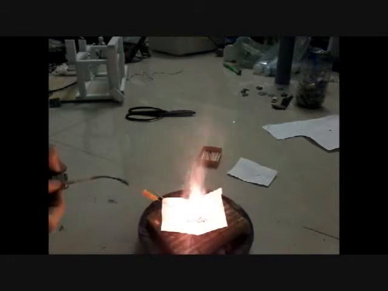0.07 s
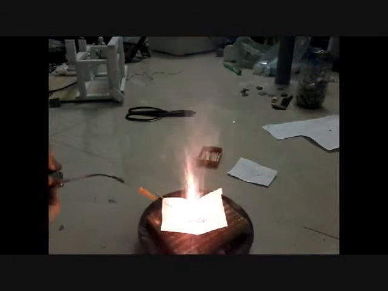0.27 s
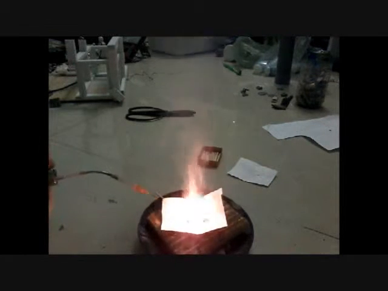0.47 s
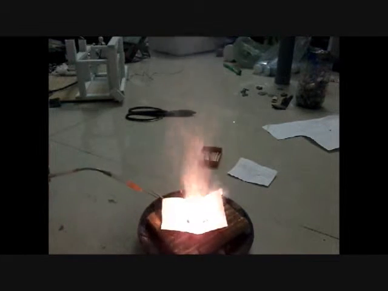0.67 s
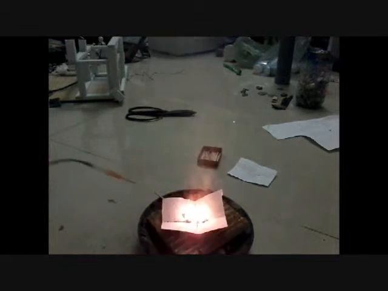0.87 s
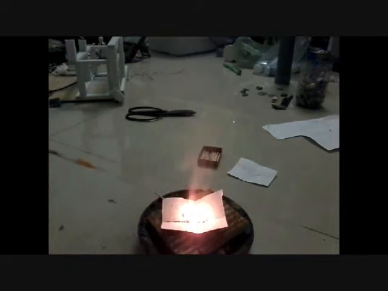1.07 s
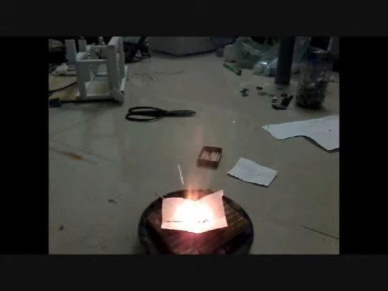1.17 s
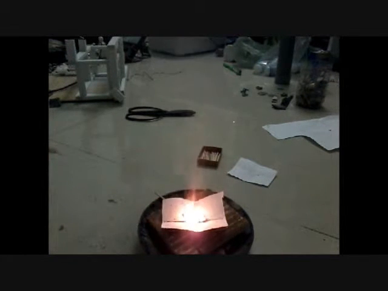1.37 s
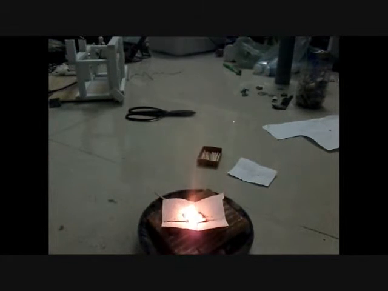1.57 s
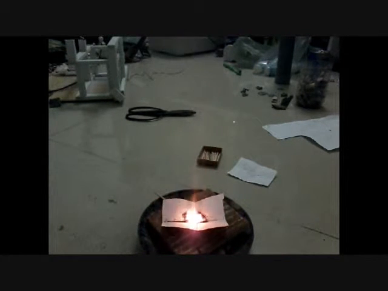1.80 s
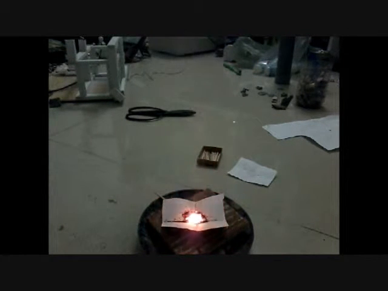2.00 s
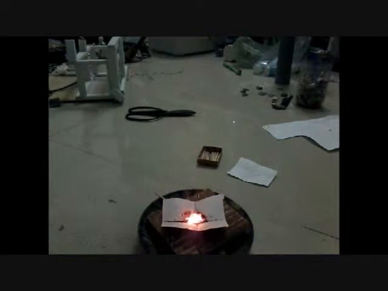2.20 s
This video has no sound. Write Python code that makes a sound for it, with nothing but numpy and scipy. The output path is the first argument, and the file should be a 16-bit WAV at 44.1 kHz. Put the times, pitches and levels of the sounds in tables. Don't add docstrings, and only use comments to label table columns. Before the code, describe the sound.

A small heap of powder flares on paper, fizzing brightly with loud sharp pops, then sputtering out

```python
import sys
import numpy as np
from scipy import signal
from scipy.fft import rfft, irfft
from scipy.io import wavfile

SR = 44100
rng = np.random.default_rng(int(sys.argv[2]) if len(sys.argv) > 2 else 0)


def generate_wav(signal):
    frames = np.transpose(np.atleast_2d(signal))
    scaled = np.clip(frames, -1, 1) * 32767
    pcm = np.round(scaled).astype(np.int16)
    wavfile.write(sys.argv[1], SR, pcm)


def natural_amplitude(level_db):
    exponent = np.asarray(level_db, float) / 20
    return 10 ** exponent


N = 98872

# time in seconds, fizz level in dB.
BURN = [(0, -45), (.12, -39), (.25, -32.5), (.32, -35), (.41, -30.5), (.54, -33), (.62, -32), (.8, -28.5),
        (.9, -30), (1.05, -34.5), (1.2, -37), (1.3, -34), (1.42, -35.5), (1.55, -37.5), (1.75, -29),
        (1.88, -40), (2.02, -46), (2.24, -46.5)]
# time in
# seconds, peak in dB.
LARGE_GRAIN_POPS = [(0.1868, -19), (0.2491, -18), (0.2559, -18), (0.3427, -17), (0.3541, -15), (0.3686, -16),
                    (0.3929, -11), (0.4128, -16), (0.4402, -14), (0.5083, -16), (0.6987, -8), (0.7093, -15),
                    (0.7165, -13), (0.7736, -11), (0.8284, -10), (0.8537, -4), (0.8571, -13), (0.875, -9),
                    (0.8944, -14), (0.9131, -12), (0.9296, -4), (0.9332, -6), (0.98, -6), (1.0022, -17),
                    (1.0137, -13), (1.0462, -19), (1.0879, -19), (1.0904, -9), (1.1298, -14), (1.1327, -20),
                    (1.2555, -21), (1.2611, -8), (1.2728, -13), (1.3008, -13), (1.3705, -12), (1.3856, -18),
                    (1.4127, -19), (1.4321, -18), (1.4395, -19), (1.4441, -20), (1.5538, -16), (1.56, -18),
                    (1.5872, -9), (1.824, -18), (1.8774, -19), (1.9544, -19), (1.9759, -23), (2.0323, -21),
                    (2.0713, -25), (2.0739, -24), (2.0768, -28), (2.1107, -28), (2.1239, -26),
                    (2.1258, -17), (2.1327, -26), (2.1415, -22), (2.1515, -21), (2.1607, -24),
                    (2.1662, -21), (2.2249, -26)]
# time in seconds, pops per second, peak in dB.
LONG_SPUTTER = [
    (1.5995, 135, -15),
    (1.614, 150, -3),
    (1.635, 270, -7),
    (1.66, 340, -4.5),
    (1.712, 430, -3.5),
    (1.725, 640, -3.5),
    (1.75, 760, -8),
    (1.754, 800, -14),
    (1.86, 900, -35),
]
# start in seconds, length in seconds, pops per second, peak in dB.
SHORT_SPUTTERS = [
    (1.4635, .073, 320, -17.5),
    (1.568, .017, 260, -16.5),
]
# frequency in Hz, level in dB per Hz.
ROAR_COLOUR = [(88, 2), (150, -4), (412, -6), (578, -2), (1210, -17.5), (1500, -4.5), (1950, -97),
               (3300, -120)]
# time in seconds, peak in dB, pitch in Hz, length in seconds.
GULPS = [
    (.42, -47, 250, .04),
    (.495, -44, 400, .02),
    (1.285, -44, 650, .09),
    (1.453, -42, 550, .016),
    (1.61, -48, 300, .025),
]
# frequency in Hz, level in dB per Hz.
HUM_COLOUR = [(12, -38), (20, -45), (43, -28), (117, 2.5), (198, -7.5), (394, -16.5), (447, -13.5),
              (1500, -27), (1950, -37), (3300, -120)]
# frequency in Hz, level in dB.
MICROPHONE = [(2900, -22.5), (3700, -17.5), (4700, -20.5), (5900, -14), (7600, -15), (9400, -22.5),
              (11800, -19), (14400, -27.5)]
# delay in seconds, level in dB.
ECHOES = [(.0005, -13), (.0017, -14), (.0024, -14), (.0036, -17), (.007, -17)]

GRAINS_PER_S, GRAIN_SPREAD_DB, FLICKER_DB, FLICKER_HZ = 3100, 1, -1.3, 30
POP_DB, POP_TILT, POP_RISE_S = .5, .3, .0003
SPUTTER_JITTER, SPUTTER_SPREAD_DB, SPUTTER_TOP_HZ, LONG_SPUTTER_DB = .22, 2.5, 8800, -0.15
POCKET_HZ, POCKET_Q, POCKET_SHARE = 3230, 1.62, 0.81
SNAP_LOW_HZ = 776
ROAR_DB, ROAR_FOLLOW, ROAR_FLICKER_DB, ROAR_LAG_S = -50, 1, -1.5, 0.11
HUM_DB = -59
RING_HZ, RING_Q = 6180, 5
ROOM_DB, ROOM_T60_S = -9, .3
SELF_NOISE_DB, EDGE_HZ, RUMBLE_CUT_HZ = -54, 14700, 70


def evened(x):
    return x / np.sqrt(np.mean(x ** 2) + 1e-20)


def read(points, hz):
    f, value = np.transpose(points)
    return np.interp(np.log(hz + 1), np.log(f + 1), value)


def coloured(points):
    spectrum = rfft(rng.standard_normal(N))
    gain = natural_amplitude(read(points, np.fft.rfftfreq(N, 1 / SR)))
    return evened(irfft(spectrum * gain, N))


def wander(hz):
    f = np.fft.rfftfreq(N, 1 / SR)
    smooth = (f > 0) / (1 + (f / hz) ** 2)
    return evened(irfft(rfft(rng.standard_normal(N)) * smooth, N))


def burn_db():
    return np.interp(np.arange(N) / SR, *np.transpose(BURN))


def fizz():
    draw = rng.random((N, 3))
    size_db = GRAIN_SPREAD_DB * np.minimum(-np.log(draw[:, 1] + 1e-9), 5)
    push_or_pull = np.sign(draw[:, 2] - .5)
    snapping = draw[:, 0] < GRAINS_PER_S / SR
    grains = evened(natural_amplitude(size_db) * push_or_pull * snapping)
    return grains * natural_amplitude(burn_db() + FLICKER_DB * wander(FLICKER_HZ))


def pops():
    s, db = np.transpose(np.array(LARGE_GRAIN_POPS))
    clicks = np.zeros(N)
    clicks[np.round((s - POP_RISE_S) * SR).astype(int)] = natural_amplitude(db + POP_DB)
    return signal.lfilter([1, -POP_TILT], [1], clicks)


def bubble_train(s, rate_hz, db):
    t = np.arange(N) / SR
    unevenness = np.clip(1 + SPUTTER_JITTER * wander(250), .2, 2)
    pace = np.interp(t, s, rate_hz, 0, 0) * unevenness
    burst = np.diff(np.floor(np.cumsum(pace) / SR + .85), prepend=0)
    spread_db = SPUTTER_SPREAD_DB * np.clip(rng.standard_normal(N), -2, 1)
    return burst * natural_amplitude(np.interp(t, s, db) + spread_db)


def sputter():
    out = bubble_train(*np.transpose(LONG_SPUTTER)) * natural_amplitude(LONG_SPUTTER_DB)
    for s, length, rate_hz, db in SHORT_SPUTTERS:
        times = [s, s + length * .6, s + length]
        out = out + bubble_train(times, [rate_hz] * 3, [db - 2, db + 2.5, db - 4])
    hollow = signal.lfilter(*signal.iirpeak(POCKET_HZ, POCKET_Q, SR), out)
    out = 0.71 * out + POCKET_SHARE * hollow
    return signal.sosfilt(signal.butter(3, SPUTTER_TOP_HZ, fs=SR, output="sos"), out)


def roar():
    t = np.arange(N) / SR
    keep = np.exp(-1 / (ROAR_LAG_S * SR))
    start_db = BURN[0][1]
    late_db = signal.lfilter([1 - keep], [1, -keep], burn_db() - start_db) + start_db
    level_db = ROAR_DB + ROAR_FOLLOW * (late_db + 31) + ROAR_FLICKER_DB * wander(4.7)
    out = coloured(ROAR_COLOUR) * natural_amplitude(level_db)
    for s, db, hz, length in GULPS:
        band = [(hz / 4, -30), (hz / 1.8, -3), (hz, 0), (hz * 2.2, -5), (hz * 6, -25)]
        swell = np.exp(-((t - s) / length * 2) ** 2)
        out = out + coloured(band) * natural_amplitude(db - 6 + 2 * wander(60)) * swell
    return out


def hum():
    return natural_amplitude(HUM_DB) * coloured(HUM_COLOUR)


def microphone_ring():
    hz = np.fft.rfftfreq(4096, 1 / SR)
    resonance = 1 / abs(1 - (hz / RING_HZ) ** 2 + 1j * hz / RING_HZ / RING_Q)
    half = np.log(natural_amplitude(read(MICROPHONE, hz)) * resonance)
    full = np.concatenate([half, half[-2:0:-1]])
    ring = np.fft.ifft(np.exp(full - 1j * signal.hilbert(full).imag)).real[:1024]
    return ring / abs(signal.hilbert(ring)).max()


def room():
    t, taps = np.arange(SR // 2) / SR, np.zeros(SR // 2)
    at = np.arange(200, SR // 2 - 20, 20)
    taps[at + rng.integers(0, 20, len(at))] = rng.choice([-1., 1.], len(at))
    taps = taps * natural_amplitude(-60 * t / ROOM_T60_S)
    taps = taps * natural_amplitude(ROOM_DB) / np.linalg.norm(taps)
    taps[0] = 1
    for k, (s, db) in enumerate(ECHOES):
        taps[round(s * SR)] = natural_amplitude(db) * (-1) ** (k // 2)
    return taps


def scene():
    ring = microphone_ring()
    snaps = fizz() / np.linalg.norm(ring) + pops() + sputter()
    snaps = signal.sosfilt(signal.butter(2, SNAP_LOW_HZ, "high", fs=SR, output="sos"), snaps)
    heard = signal.fftconvolve(snaps, np.convolve(ring, room()))[:N]
    return (heard + roar() + hum())[None]


def top_cut(x):
    return signal.sosfilt(signal.butter(12, 15490, fs=SR, output="sos"), x)


def record(dry):
    x = 1.371 * np.tanh(dry[0] / 1.103) + natural_amplitude(SELF_NOISE_DB) * rng.standard_normal(N)
    x = signal.oaconvolve(x, signal.firwin(129, EDGE_HZ, fs=SR), "same")
    x = signal.sosfilt(signal.butter(2, RUMBLE_CUT_HZ, "high", fs=SR, output="sos"), x)
    return top_cut(x[None])


dry = scene()
out = record(dry)
generate_wav(out)
```